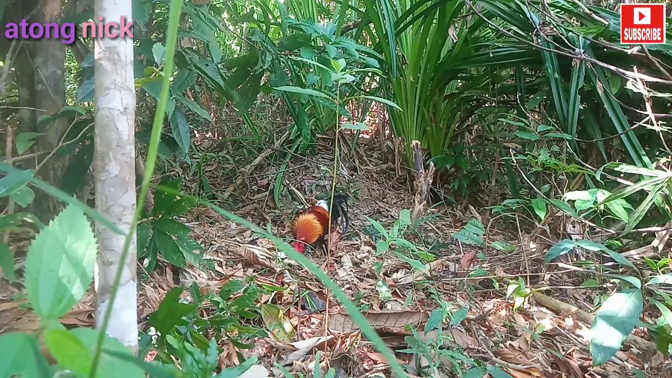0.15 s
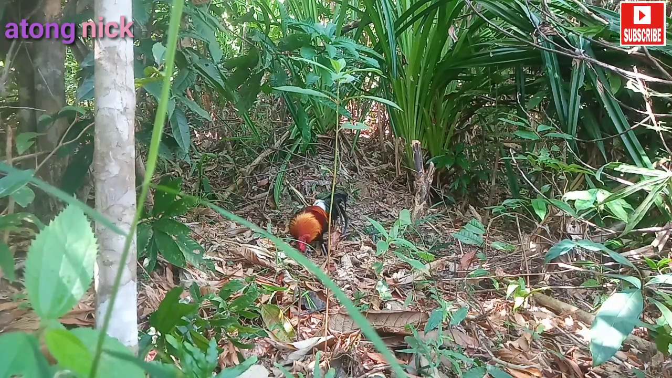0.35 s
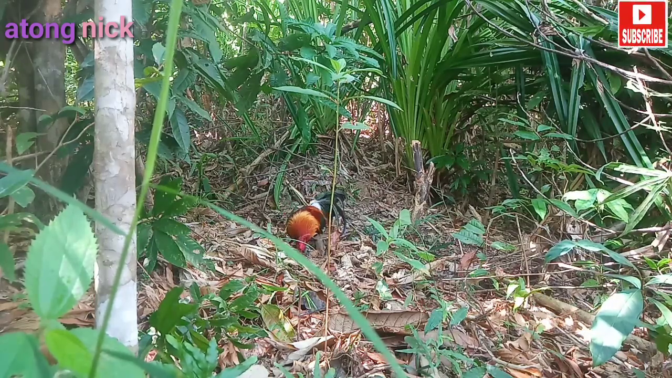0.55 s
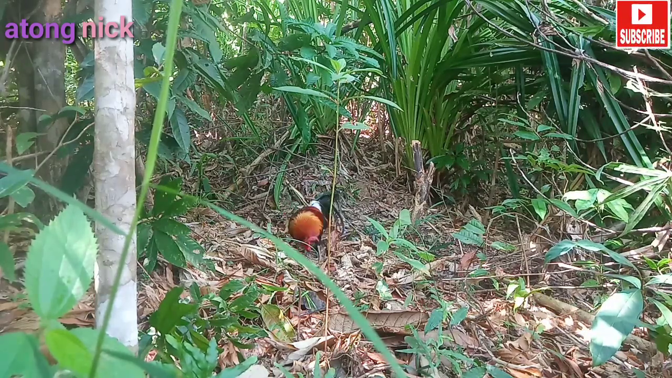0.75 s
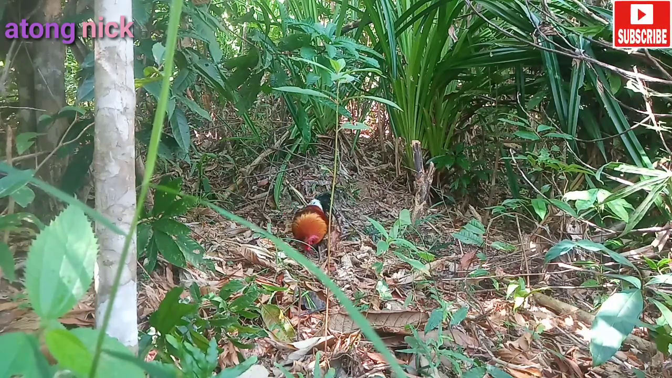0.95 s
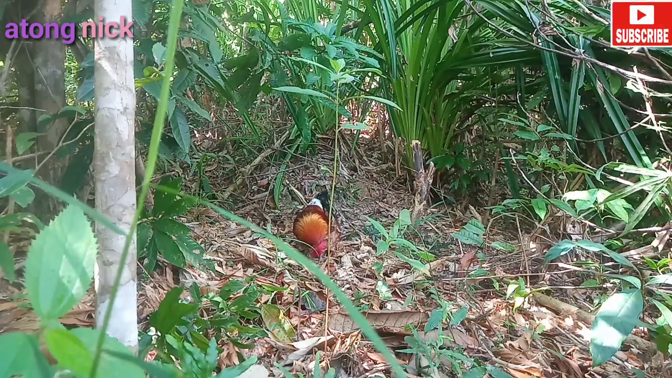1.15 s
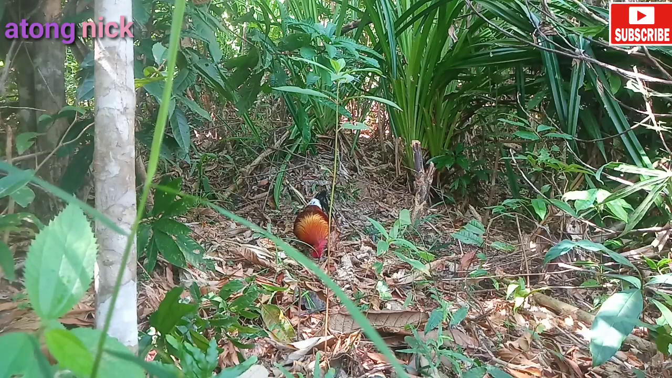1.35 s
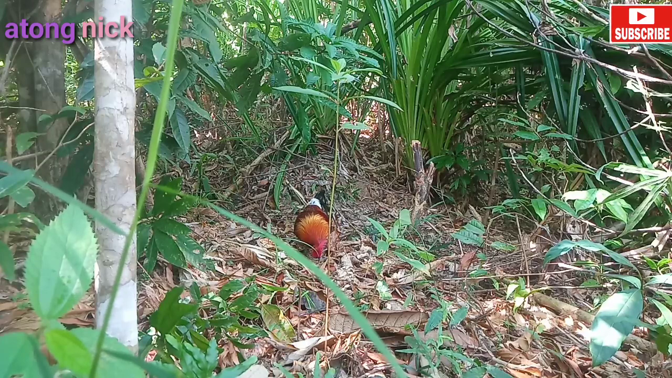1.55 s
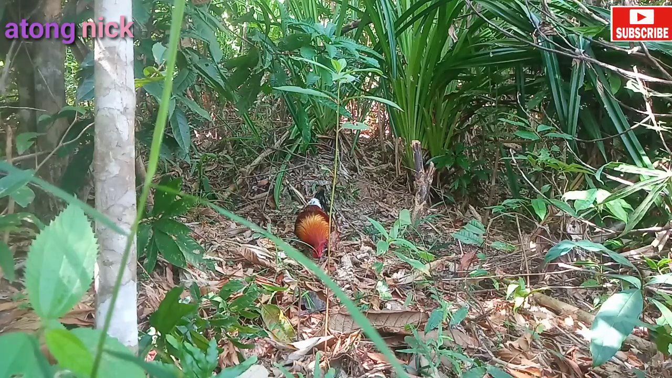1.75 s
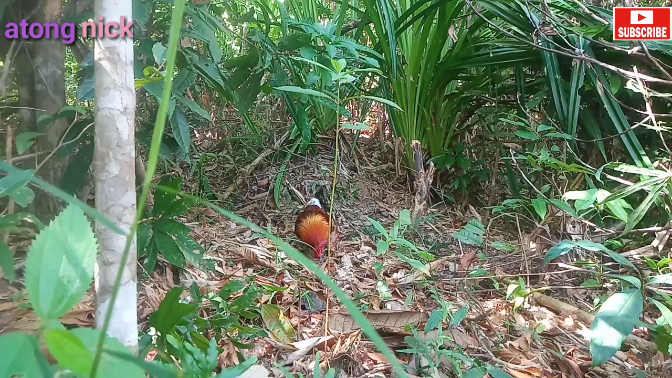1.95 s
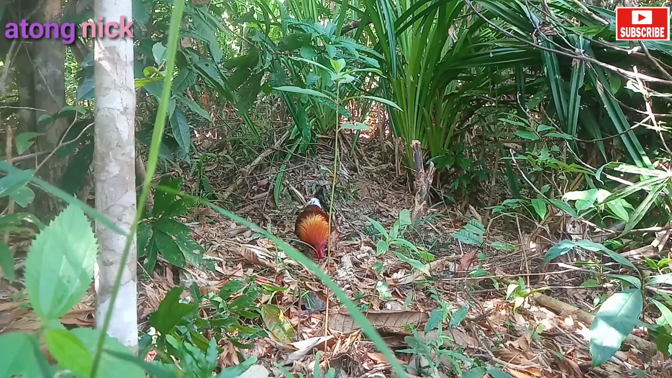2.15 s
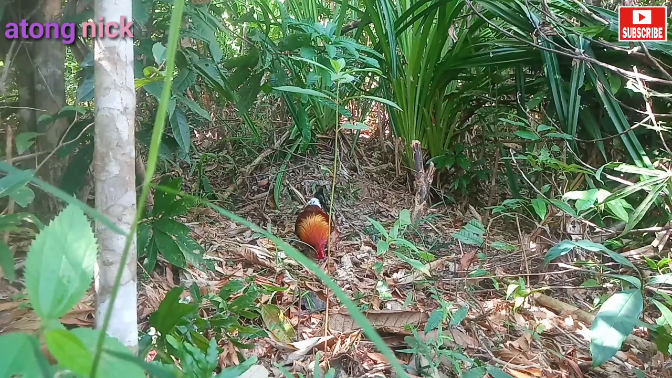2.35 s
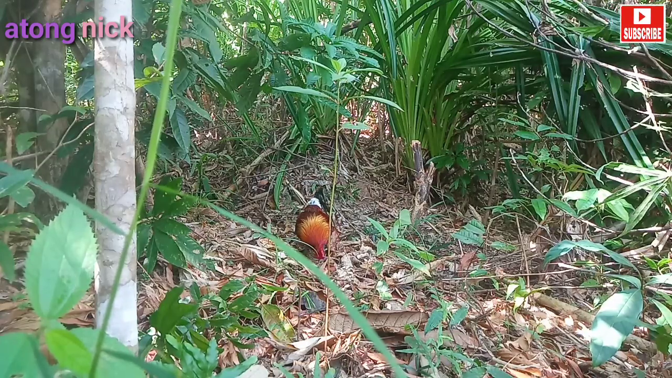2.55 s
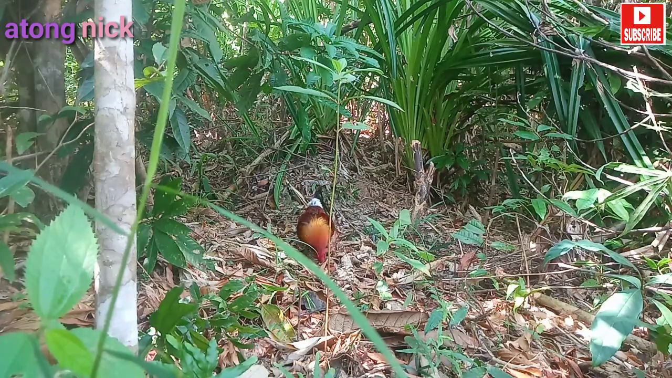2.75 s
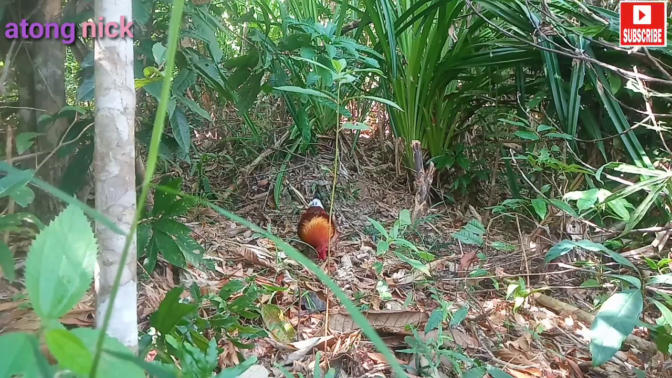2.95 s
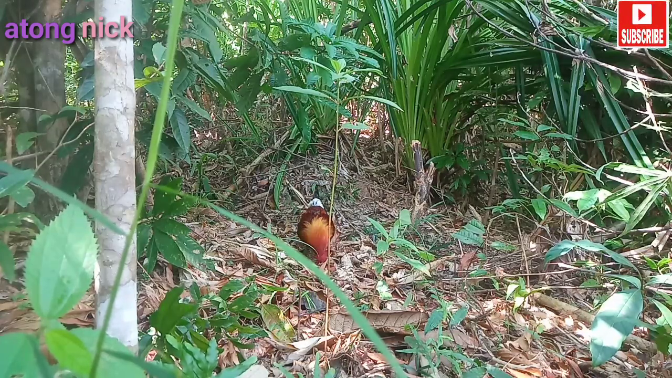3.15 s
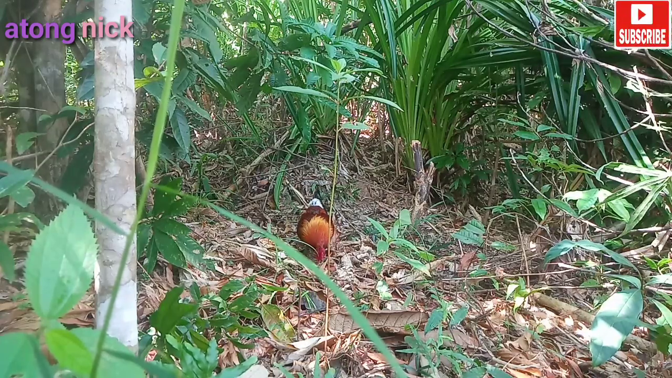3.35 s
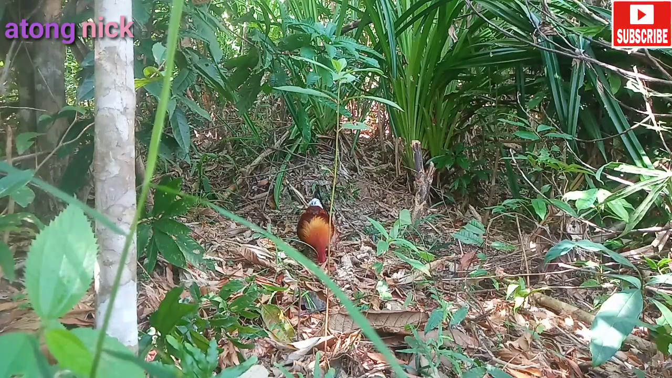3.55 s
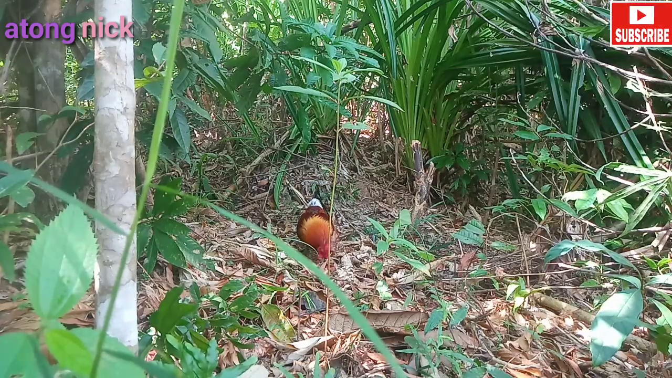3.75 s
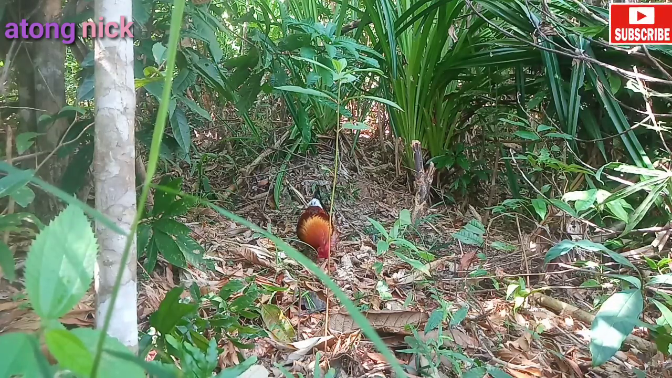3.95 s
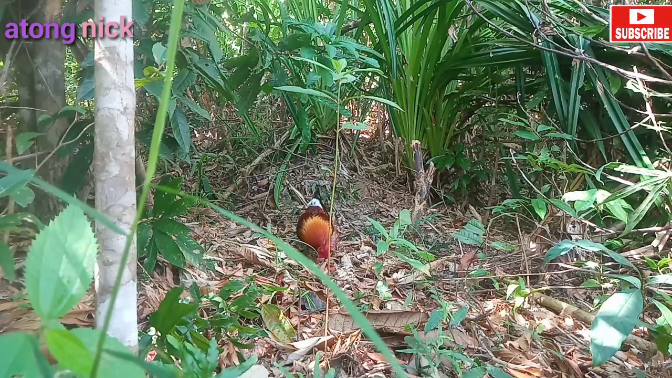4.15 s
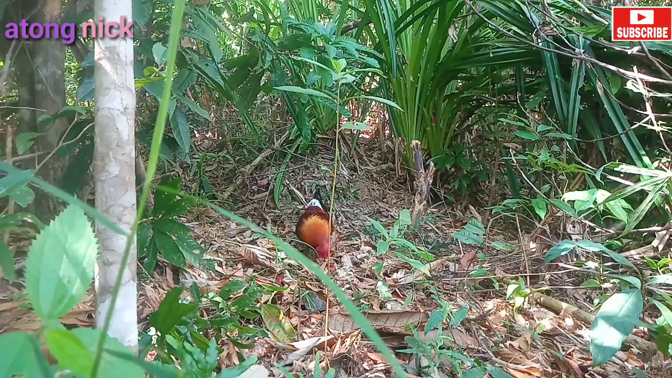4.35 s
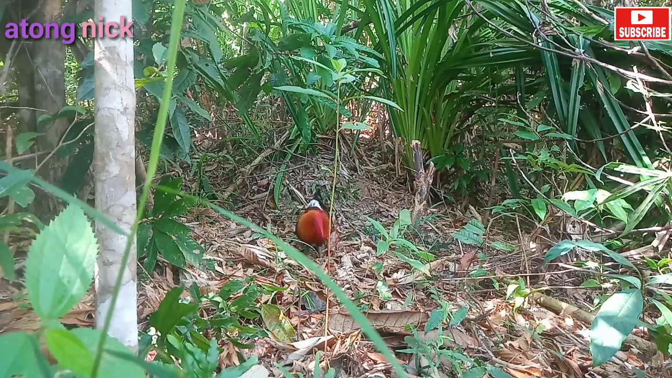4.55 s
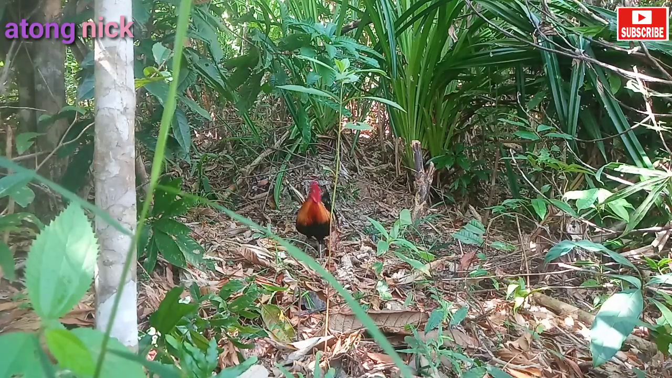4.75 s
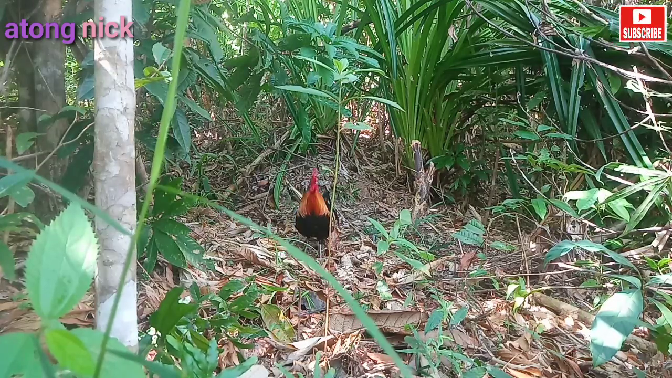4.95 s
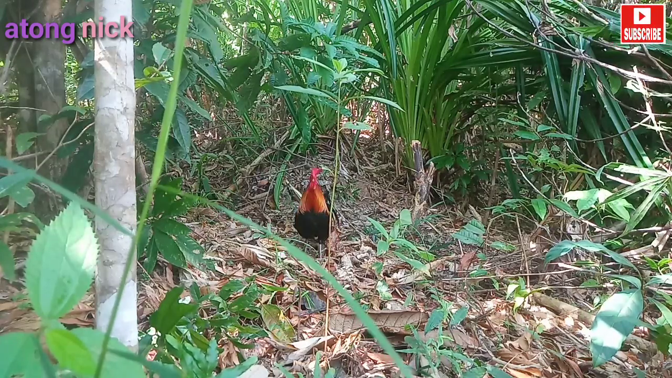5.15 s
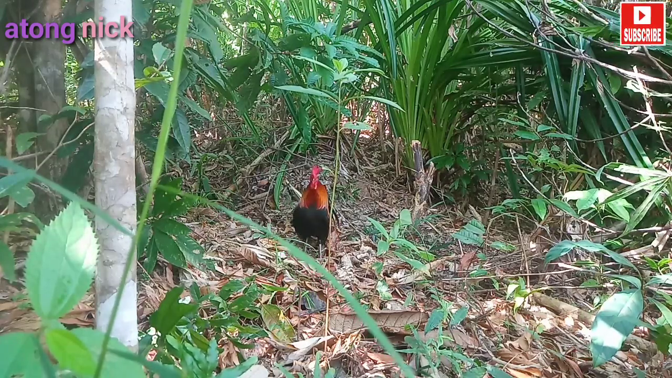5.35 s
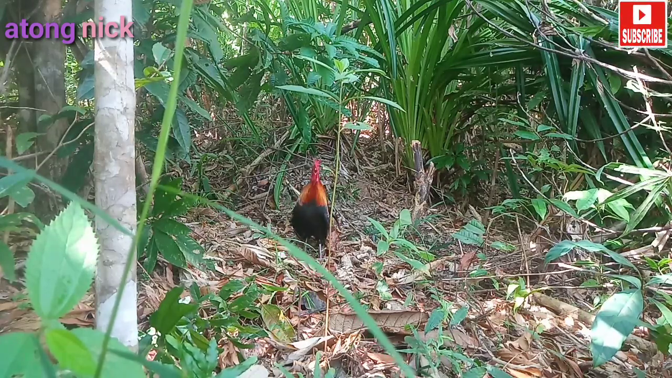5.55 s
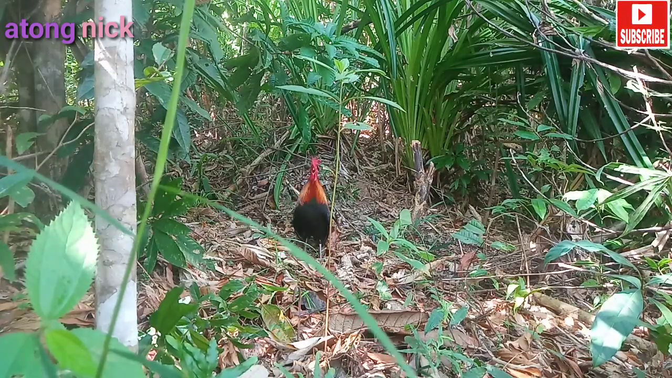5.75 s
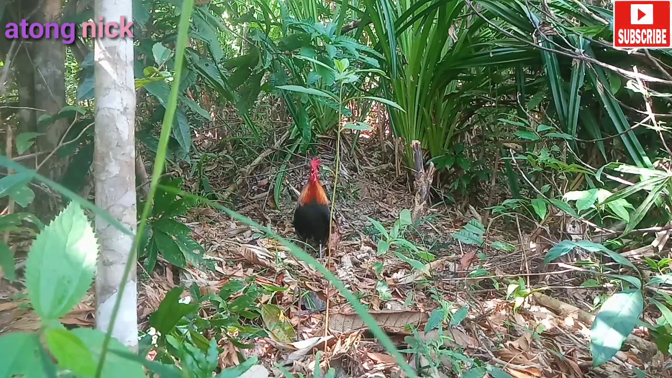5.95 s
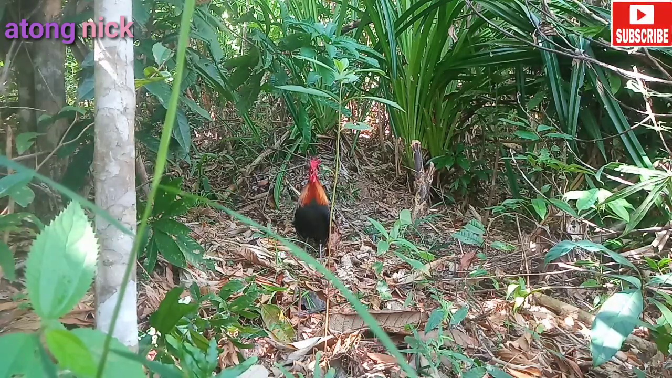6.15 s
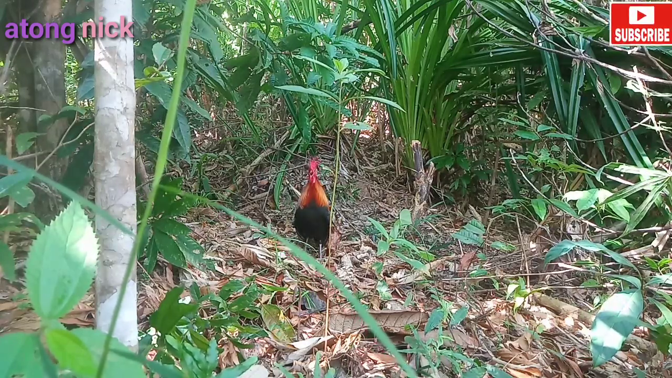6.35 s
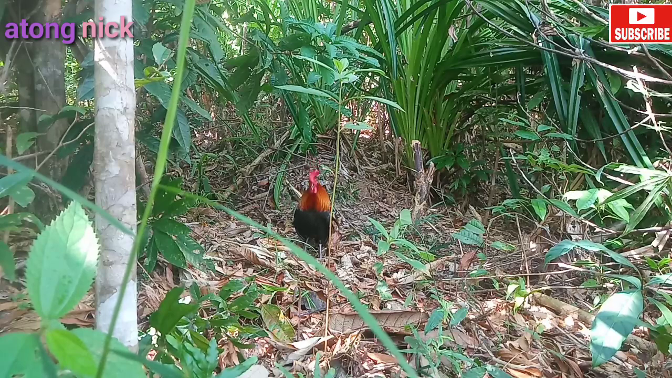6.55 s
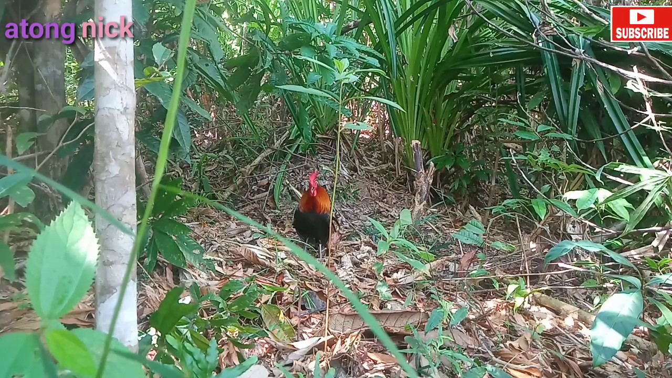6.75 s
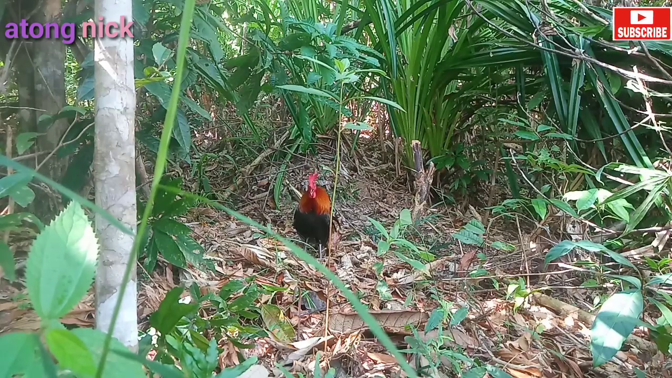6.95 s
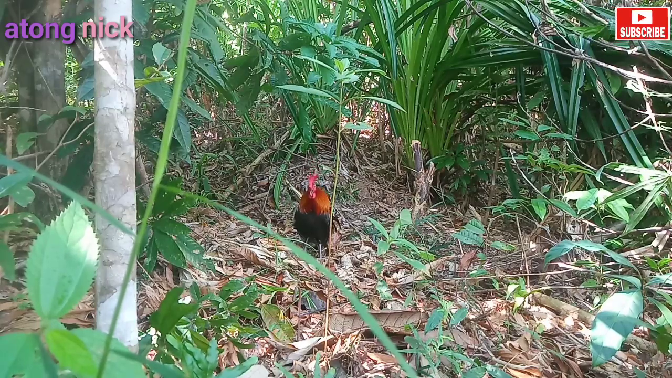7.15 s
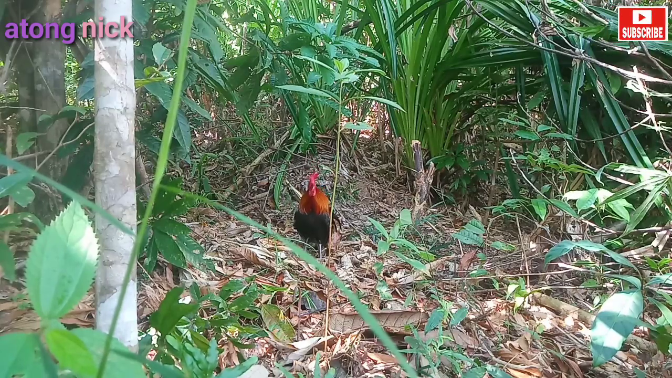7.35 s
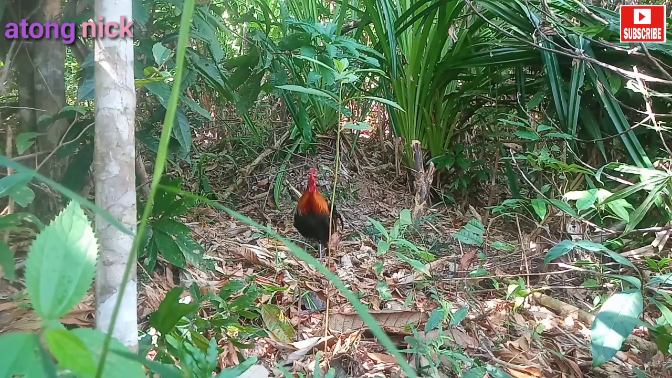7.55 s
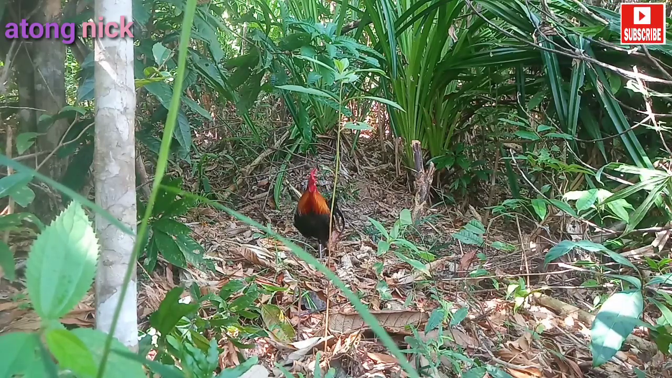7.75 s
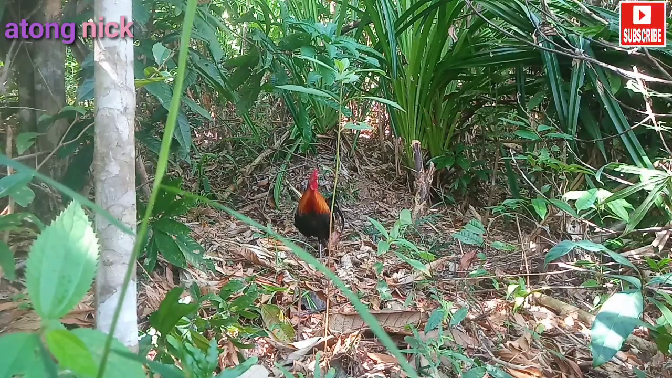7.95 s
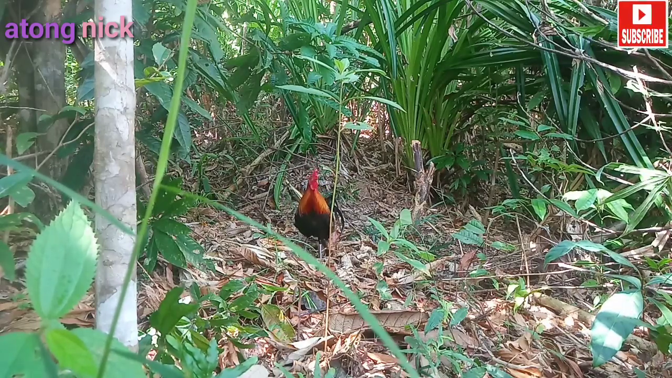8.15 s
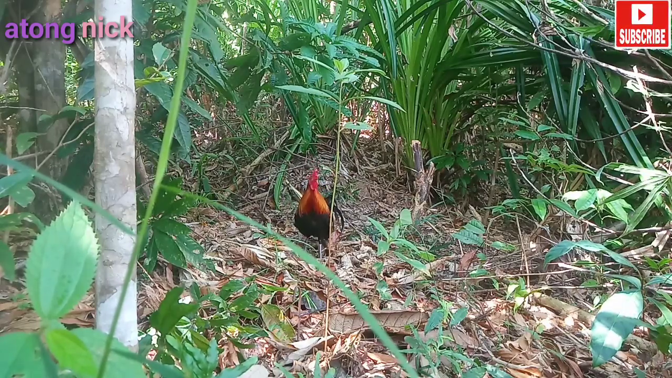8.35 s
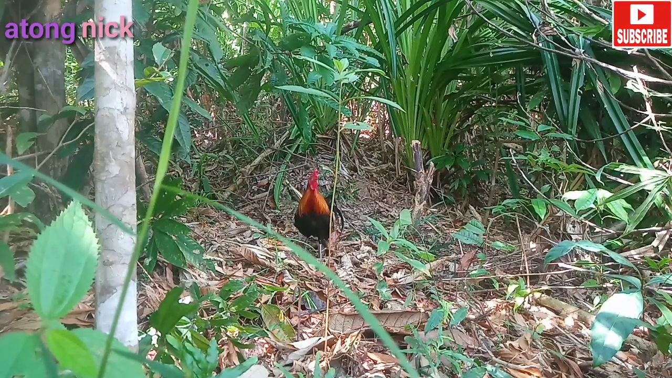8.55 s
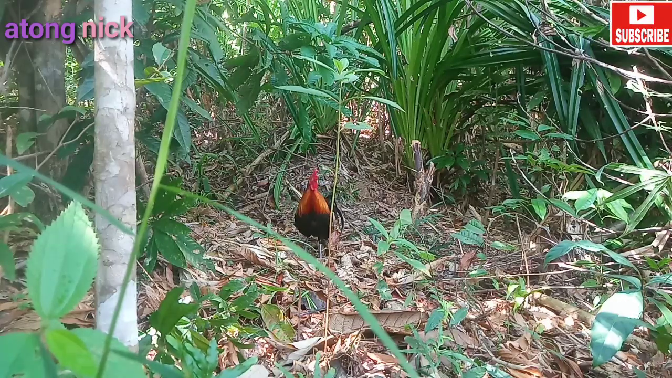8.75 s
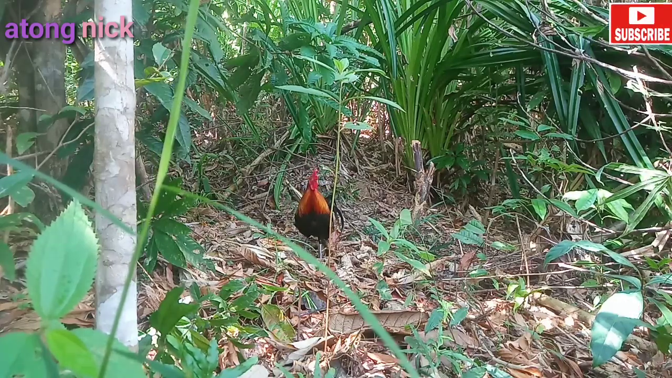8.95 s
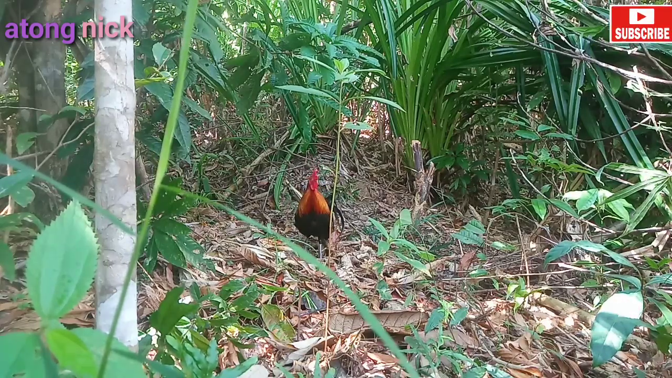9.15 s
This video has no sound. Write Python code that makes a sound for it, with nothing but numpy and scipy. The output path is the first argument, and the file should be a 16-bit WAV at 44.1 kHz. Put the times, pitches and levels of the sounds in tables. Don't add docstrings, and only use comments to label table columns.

```python
import sys
import numpy as np
from scipy import signal
from scipy.fft import rfft, irfft
from scipy.io import wavfile
from scipy.ndimage import uniform_filter1d, minimum_filter1d, map_coordinates

SR = 44100
rng = np.random.default_rng(int(sys.argv[2]) if len(sys.argv) > 2 else 0)


def waveform_to_disk(signal):
    frames = np.transpose(np.atleast_2d(signal))
    scaled = np.clip(frames, -1, 1) * 32767
    samples = np.round(scaled).astype(np.int16)
    wavfile.write(sys.argv[1], SR, samples)


def attenuation_scalar(level_db):
    decades = np.asarray(level_db, float) / 20
    return 10 ** decades


N = 406161

# [t/s, level/dB]
EFFORT = [
    [(5.42, -56.5), (5.426, -9), (5.432, 0.5), (5.452, -3), (5.48, -5), (5.556, -11.5), (5.59, -19),
     (5.622, -30), (5.635, -33.5), (5.665, -43.5)],
    [(5.67, -46), (5.69, -20), (5.704, -6.5), (5.95, -10.5), (6.2, -8), (6.405, -10.5), (6.428, -16),
     (6.448, -20), (6.495, -26.5), (6.58, -24.5)],
    [(6.51, -18), (6.55, -17.5), (6.58, -15), (6.604, -10), (6.758, -9.5), (6.996, -13), (7.15, -14)],
    [(7.12, -15), (7.174, -19), (7.258, -24), (7.316, -30), (7.35, -61.5)],
]
# [f/Hz, width/Hz, level/dB]
PIPE = [
    [(1070, 110, -14.5), (1300, 16, -24.5), (1801, 190, -3), (1927, 200, -3), (2440, 50, -24.5),
     (2920, 92, -12), (3080, 90, -4.5), (3400, 200, -20.5), (4126, 150, -20.5), (4320, 76, -19)],
    [(964, 91, -8.5), (1695, 110, 1), (1986, 70, -4), (2090, 100, -1.5), (2360, 81, -7), (2700, 20, -0.5),
     (2880, 110, -2.5), (3280, 78, -16), (4020, 55, -17.5), (4240, 110, -8.5), (5020, 71, -30.5)],
    [(760, 44, -14.5), (1050, 90, -18), (1810, 91, -2), (1934, 270, -1.5), (2082, 50, 1.5),
     (2400, 160, -11), (2666, 91, -11), (2785, 75, -1.5), (3160, 130, -17.5), (3973, 90, -12.5)],
    [(757, 52, -2.5), (1104, 110, -16.5), (1725, 180, -6), (1990, 78, 0), (2390, 120, -9), (2776, 69, -3.5),
     (3240, 54, -13.5), (4026, 72, -13)],
]
# [f/Hz, level/dB per Hz]
BODY = [
    [(240, -86), (400, -51), (866, -12.5), (1490, -29), (1920, 7.5), (2260, -16), (2920, -14), (4110, -26),
     (5600, -50), (7280, -83.5), (12300, -120)],
    [(240, -82), (400, -48.5), (946, -14), (1300, -14), (1680, -2), (2920, -8), (3720, -17), (4340, -17.5),
     (5600, -46.5), (7280, -81.5), (12300, -120)],
    [(240, -80), (400, -36.5), (751, -17), (1210, -35.5), (2050, 2.5), (2260, -11), (2760, -11.5),
     (4070, -21.5), (5600, -61), (7280, -94.5), (12300, -120)],
    [(240, -76), (400, -32.5), (672, -26), (751, -30.5), (936, -21), (2340, -1.5), (2980, -22.5),
     (4160, -23.5), (5600, -63.5), (7280, -105), (12300, -120)],
]
# [f/Hz, width/Hz, level/dB]
BEAK = [
    [(5400, 820, -53), (7200, 650, -53.5), (8100, 350, -49), (10400, 2520, -65.5), (13500, 5000, -69.5)],
    [(5040, 410, -32), (5200, 200, -32), (6150, 350, -36.5), (6620, 350, -43.5), (7170, 500, -30.5),
     (8000, 800, -43.5), (8630, 460, -40.5), (11000, 3400, -67.5), (13600, 1000, -65.5),
     (14940, 900, -58.5)],
    [(5050, 400, -47), (6000, 900, -65), (7150, 400, -54), (7620, 700, -47), (8250, 260, -42),
     (9250, 450, -51.5), (10400, 350, -55), (10940, 300, -62), (11850, 400, -65.5), (13360, 1700, -66.5),
     (15100, 900, -61.5)],
    [(5060, 600, -67), (7560, 1000, -59.5), (8300, 400, -53), (9300, 490, -64), (10460, 700, -70.5)],
]
# [mean beat rate/Hz, fade in/s, fade out/s, resonance shift at start/%, at end/%]
PARTS = [
    (960, 0.012, 0.014, 1.3, -6.5),
    (892, 0.011, 0.064, 1.2, -1.5),
    (900.6, 0.05, 0.045, 0.061, -1),
    (864, 0.033, .02, 1, 1),
]
# [brightness above 3 kHz/dB, its drift/(dB/s), beak level/dB, its drift/(dB/s)]
MOUTH = [
    (-1, -18, -2.5, -5.5),
    (1.5, -5, -1, -2.5),
    (-3, 10.5, -6, 7.5),
    (2, 17.5, 0, -34.5),
]
# [shift at start/%, settled shift/%, time constant/s]
BEAK_SLIDE = [
    (4.5, -8, 0.16),
    (0.5, 0.5, .4),
    (-4, -0.5, 0.11),
    (0, -1.5, .2),
]
# [t/s, length/s, level/dB]
TIPS = [(5.685, .1, 4), (5.885, .07, 4.5), (5.955, .07, -7), (6.055, .045, -5), (6.13, .04, 3),
        (6.215, .03, 6.5), (6.27, .06, 4), (6.35, .055, -5), (6.41, .04, 5), (6.57, .05, 3.5),
        (6.63, .03, -1.5), (6.68, .04, 2), (6.74, .06, -3), (6.93, .05, -2.5), (7.0, .04, 3)]
# [t/s, length/s, level/dB]
CHEST = [(5.76, .09, 4.5), (5.875, .03, -6.5), (6.02, .05, -5.5), (6.28, .05, 3), (6.5, .08, -8.5),
         (6.565, .095, -6), (6.675, .05, 3), (6.75, .03, 4.5), (6.87, .1, -2.5), (7.11, .028, -6),
         (7.04, .025, -5), (7.14, .03, 3), (7.195, .012, -10.5)]
# [t/s, length/s, level/dB]
RINGS = [(5.695, .03, 3), (5.73, .065, -4), (5.87, .07, -3), (5.95, .07, 2), (6.04, .08, -3),
         (6.2, .08, -3), (6.49, .085, -12), (6.615, .045, 3), (6.69, .1, -4), (6.805, .075, 3),
         (6.88, .03, -5), (6.915, .085, 3), (7.12, .06, -4), (7.19, .04, 3), (7.232, .03, -9),
         (7.3, .05, -6)]
# [t/s, length/s, level/dB]
BRIDGE = [
    (6.44, .125, 5),
]
# [t/s, length/s, f/Hz, level/dB, ducking of the hoarse voice/dB]
LOCKS = [(5.431, 0.0076, 1355, 2.5, -13.5), (6.025, 0.021, 1690, -10, -6.5), (6.115, 0.013, 1705, -3, -13),
         (6.452, 0.11, 1740, -30.5, -1.5), (6.495, 0.051, 1825, -28, -2), (5.692, .055, 1715, -16, -1.5),
         (5.745, .048, 1670, -16, -1.5), (5.895, .06, 1690, -17, -1.5), (6.07, .03, 2130, -17, -1.5),
         (6.215, .03, 1670, -16, -2), (6.36, .04, 2110, -18, -1.5), (6.405, .035, 1690, -17, -2),
         (6.58, .04, 1850, -17, -2), (5.72, .055, 1990, -19, -1), (5.835, .045, 2010, -19, -1),
         (5.955, .06, 2130, -18, -1), (6.68, .04, 1830, -18, -1), (6.76, .045, 2090, -18, -1),
         (6.935, .04, 2090, -19, -1.5), (7.064, .044, 866, -17, -14), (7.102, .036, 856, -20, -5),
         (7.166, .027, 763, -19, -12), (7.203, .026, 1045, -29.5, -2.5), (7.242, 0.032, 1018, -22.5, -11),
         (7.262, 0.016, 758, -49, 0), (7.286, 0.044, 835, -38.5, -8)]
# [f/Hz, level/dB]
LOCK_COLOUR = [(760, -4), (860, -13), (1000, -16), (1400, -10), (1530, -14), (1700, 0), (2300, 1),
               (2600, -6), (3050, -26), (3450, -21), (4300, -28), (5200, -52), (6500, -70), (7800, -38),
               (8800, -50), (12000, -62)]
# [t/s, f/Hz, level/dB]
GROAN = [(7.365, 200, -70), (7.385, 215, -60), (7.415, 265, -58), (7.445, 300, -50), (7.5, 322, -49),
         (7.527, 322, -50), (7.552, 280, -64), (7.58, 270, -75)]
# [f/Hz, level/dB]
GROAN_COLOUR = [(210, 0.5), (300, 15.5), (430, 14), (620, 3), (900, -8), (1300, -9)]
# [t/s, length/s, lift/dB]
GRUMBLES = [(5.72, .055, 17), (5.78, .07, 18), (6.09, .03, 14), (6.2, .03, 14), (6.285, .035, 15),
            (6.34, .06, 10), (6.85, .22, 13)]
# [t/s, low f/Hz, top f/Hz, end f/Hz, level/dB, hold/s]
BIRDS = [(.118, 3010, 4770, 3360, -63, .045), (2.066, 3500, 4430, 3800, -60.5, .045),
         (2.412, 3550, 4980, 3350, -60, .04), (2.974, 3470, 4880, 3400, -58.5, 0.037)]
# [t/s, length/s, f/Hz, end f/Hz, level/dB]
GLIDING_NOTES = [(.2, .03, 4550, 3450, -62), (.22, 0.2, 4880, 4780, -72), (.398, .036, 5150, 6250, -67),
                 (0.424, 0.038, 6280, 6050, -60), (.465, .055, 6020, 5920, -70), (0.523, .12, 6000, 6000, -82),
                 (0.223, 0.064, 3460, 3210, -56), (0.274, 0.05, 1103, 895, -59), (2.04, .06, 6300, 6400, -82),
                 (2.72, 0.058, 3010, 3080, -58), (8.804, 0.031, 1110, 1110, -60.5),
                 (8.885, 0.024, 6200, 6150, -72), (8.92, 0.018, 3880, 3910, -42),
                 (8.934, 0.042, 4060, 5330, -46.5), (8.973, 0.068, 5330, 5670, -52),
                 (9.045, .03, 5550, 5300, -62)]
# [t/s, crackle level/dB, leaf body level/dB, t60/s, rise/s]
LEAVES = [(0.52, -56, -41, 0.11, 0.00027), (.527, -72, -38, 0.56, 0.0046), (.54, -62, -50, .06, .002),
          (0.552, -57, -41.5, 0.13, 0.00045), (0.588, -61, -44, 0.07, .003),
          (0.66, -61, -37, 0.074, 0.00035), (0.689, -62, -47, .1, .002), (.702, -66, -44, 0.3, 0.004),
          (0.676, -55, -39, 0.093, .001), (2.364, -56, -59, 0.15, .003), (2.405, -49, -60, 0.15, .02),
          (2.605, -58, -58, 0.14, .01), (2.644, -55, -58, 0.29, .025), (2.911, -56, -45, 0.14, 0.016),
          (2.97, -56, -61, 0.25, .02), (3.2115, -54, -50, 0.025, .001), (3.6207, -63, -53, 0.08, 0.0055),
          (4.114, -48, -56, 0.13, 0.016), (4.169, -51, -40, 0.17, 0.016), (4.204, -64, -41, 0.093, 0.017),
          (8.8374, -53.5, -47.5, 0.059, 0.00075)]
# [f/Hz, level/dB]
CRACKLE = [(4500, -21), (6000, 1.5), (7500, 1.5), (8500, -11), (10000, -33), (12000, -74)]
# [f/Hz, level/dB]
LEAF = [(300, -100), (700, -13.5), (1200, -7.5), (3000, -4.5), (4800, -15), (6000, -41), (8000, -73)]
# [t/s, peak level/dB]
SNAPS = [(.5203, -34), (0.5535, -31), (.5595, -36), (.587, -37), (.6598, -28), (.679, -38)]
# [f/Hz, level/dB, t60/s]
TWIG = [(1150, -6, .05), (1600, -8, .02), (2600, -3.5, .022), (3300, -8, .015), (4600, -9, .014),
        (6200, -18, .008)]
# [t/s, centre f/Hz, level/dB]
SWISH = [(4.17, 2700, -68), (4.2, 3214, -43), (4.26, 3216, -58), (4.38, 3540, -56), (4.45, 3500, -59)]
# [t/s, level/dB]
WIND = [(0, -52), (1.3, -50), (2.3, -54.5), (5.4, -54.5), (7.3, -55.5), (7.85, -60), (8.45, -53.5),
        (8.5, -63), (8.75, -64.5), (8.8, -53.5), (9.21, -56)]
# [t/s, level/dB]
GUSTS = [(.25, 7.5), (.49, 1.5), (.75, 3.5), (.89, 0), (1.02, 6.5), (1.14, 6), (1.37, 1), (1.55, 6),
         (2.36, 5), (3.02, 6), (3.45, 7), (3.78, 9), (4.2, -1), (4.89, 7.5), (5.1, 9), (9.17, 7)]
# [f/Hz, level/dB per Hz]
RUMBLE = [(12, -46.5), (20, -15.5), (27, -21), (72, 2), (129, 4.5), (157, 2), (270, -10), (535, -22),
          (600, -19), (780, -27.5), (1320, -120)]
# [f/Hz, level/dB per Hz]
FOREST = [(150, -29), (250, -5), (530, -7), (830, -9), (1230, -4.5), (1700, -6), (2500, -5.5), (3300, -5),
          (3900, -8.5), (4150, -18), (4500, -14), (4900, -21.5), (5200, -31.5), (7000, -70.5)]
# [t/s, level/dB]
HISS = [(0, -71.5), (9.21, -73)]
# [f/Hz, level/dB per Hz]
HISS_COLOUR = [(300, -1.6), (5000, -0.27), (8000, 1), (15000, -1)]
# [f/Hz, t60/s]
TREES = [(500, 0.47), (3000, 0.48), (8000, 0.48)]
# [t/s, level/dB]
GAIN = [(0, -0.5), (5.44, 0), (5.52, -19), (7.2, -20.5), (7.33, -6), (7.8, -3.5), (9.21, -4.5)]
# [t/s, level/dB]
OVERLOADS = [(5.433, -36), (5.437, -40.5), (5.452, -42), (5.477, -42), (5.706, -44), (5.736, -53.5),
             (5.801, -45), (6.015, -46.5), (6.112, -51.5), (6.13, -43.5), (6.693, -51), (6.726, -53)]

BEAK_PER_DB, BRIGHT_PER_DB = 0.23, 0.16
TIP_DB, TIP_HZ = -1, 20
STRAND_PER_DB = 0.3
STEADY, STEADY_S = 0.38, .02
EVEN, EVEN_S = .6, .008
LOCK_DULL_DB = 1.5
LOCK_TOP_PER_DB, LOCK_FULL_DB = 3, -17
TOP_DUCK = .3
GRUMBLE_DB, INSECTS_DB = -74, -54
RISE_HZ_PER_S, DROP_S, LOW_DB_PER_KHZ = 30000, 0.026, 5.5
DROP_DB, NOTE_FADE_DB = -3, -4
SNAP_DB, SNAP_S = 13, 0.0012
GUST_S = 0.057


def crow():
    sway = .4 * wobble(14)
    tip_db, chest_db, ring_db = moments(TIPS), moments(CHEST), moments(RINGS)
    parts = zip(EFFORT, MOUTH, PIPE, BEAK, BODY, PARTS, BEAK_SLIDE)
    hoarse = sum(hoarse_part(*part, sway, tip_db, chest_db, ring_db) for part in parts)
    hoarse += (attenuation_scalar(moments(BRIDGE)) - 1) * band(hoarse, 1950, 2950)
    kept = signal.sosfiltfilt(signal.butter(4, 4700, "high", fs=SR, output="sos"), hoarse)
    kept += signal.sosfiltfilt(signal.butter(2, [2700, 2920], "band", fs=SR, output="sos"), hoarse)
    clear, duck_db = locked_tones()
    ducked = (hoarse - kept) * attenuation_scalar(duck_db) + kept * attenuation_scalar(TOP_DUCK * duck_db)
    voice = ducked * attenuation_scalar(0.74 * wobble(30)) + clear
    return signal.sosfilt(signal.butter(3, 480, "high", fs=SR, output="sos"), voice)


def hoarse_part(rows, mouth, pipe, beak, body, part, slide, sway, tip_db, chest_db, ring_db):
    rate_hz, rise, fall, shift, end_shift = part
    start, end = rows[0][0], rows[-1][0]
    span = slice(round(start * SR), round(end * SR))
    level_db = curves(rows)[0][span]
    n = len(level_db)
    t = np.arange(n) / SR
    effort_db = level_db - np.median(level_db)
    bright_db = mouth[0] + mouth[1] * t + BRIGHT_PER_DB * effort_db
    beak_db = mouth[2] + mouth[3] * t + BEAK_PER_DB * effort_db

    source = beats(n + SR // 4, rate_hz, scatter=.35, size_db=2.5)
    low = mottled(coloured(source, lambda hz: throat(pipe, body, hz)), patchy_db=2.2, size=6)
    top = coloured(source, lambda hz: beak_gain(beak, hz))
    top = mottled(top, patchy_db=2, size=2)

    settling = np.exp(-t / max(slide[2], .01))
    opening = 1 + (slide[1] + (slide[0] - slide[1]) * settling + sway[span]) / 100
    top = map_coordinates(top, [SR // 8 + np.cumsum(opening)], order=5)
    speed = 1 + (np.linspace(shift, end_shift, n) + sway[span]) / 100
    low = map_coordinates(low, [SR // 8 + np.cumsum(speed)], order=5)

    edge = signal.sosfilt(signal.butter(6, 3200, "high", fs=SR, output="sos"), low)
    chest, narrow = band(low, 650, 1150), band(low, 2640, 3000)
    strand, upper = band(low, 1450, 1880), band(low, 1880, 2250)
    strand_db = TIP_DB * wobble(TIP_HZ, n) + np.clip(-STRAND_PER_DB * effort_db, -3, 8) + tip_db[span] / 2
    low = low - strand - upper
    low += attenuation_scalar(strand_db) * evened(strand) + attenuation_scalar(-tip_db[span] / 2) * evened(upper)
    low += (attenuation_scalar(chest_db[span]) - 1) * chest
    low += attenuation_scalar(ring_db[span]) * evened(narrow) - narrow

    knots = np.arange(0, n, 250)
    rasp = attenuation_scalar(1.3 * np.interp(np.arange(n), knots, rng.standard_normal(len(knots))))
    voice = (low + (attenuation_scalar(bright_db) - 1) * edge + attenuation_scalar(beak_db) * rasp * top) / np.std(low)
    swell = np.abs(uniform_filter1d(voice ** 2, size=round(STEADY_S * SR))) + .05
    out = np.zeros(N)
    out[span] = attenuation_scalar(level_db) * unit(voice / swell ** (STEADY / 2))
    return out * np.sqrt(gate(start, end, rise, fall))


def beats(n, rate_hz, scatter, size_db):
    draw = rng.standard_normal((int(n / SR * 1500), 2))
    at = np.cumsum(np.exp(scatter * draw[:, 0])) * SR / rate_hz
    whole = np.floor(at)[:, None] + np.arange(-7, 9)
    offset = whole - at[:, None]
    pulse = np.sinc(offset) * np.cos(np.pi * offset / 16) ** 2 * attenuation_scalar(size_db * draw[:, 1:])
    return np.bincount(whole.ravel().astype(int) + 8, pulse.ravel(), n)[:n]


def throat(modes, body, hz):
    return np.sqrt(resonances(modes, hz) / (1 + (hz / 4900) ** 12) + attenuation_scalar(2 * (along(body, hz) - 4.5)))


def beak_gain(modes, hz):
    return np.sqrt(resonances(modes, hz, order=3) / (1 + (5000 / (hz + 1)) ** 8))


def resonances(modes, hz, order=2):
    return sum(attenuation_scalar(2 * db) / (1 + (1.5 * (hz - c) / w) ** 2) ** order for c, w, db in modes)


def locked_tones():
    clear, duck_db, tremor = np.zeros(N), np.zeros(N), 1 + 0.0022 * wobble(140)
    colour = [(f, level - LOCK_DULL_DB * max(f / 1000 - 3, 0)) for f, level in LOCK_COLOUR]
    for s, length, hz, db, hoarse_db in LOCKS:
        span = slice(round(s * SR), round((s + length) * SR))
        on = gate(s, s + length, 0.0059)
        top_db = LOCK_TOP_PER_DB * min(db - LOCK_FULL_DB, 0)
        dulled = [(f, level + (f > 5000) * top_db) for f, level in colour]
        clear[span] += attenuation_scalar(db) * tone(hz * tremor[span], dulled, count=14) * on[span]
        duck_db += hoarse_db * on
    return clear, duck_db


def tone(pitch_hz, colour, count):
    phase = 2 * np.pi * np.cumsum(pitch_hz) / SR
    harmonics = range(1, count + 1)
    return unit(sum(attenuation_scalar(along(colour, k * pitch_hz)) * np.sin(k * phase + k * k) for k in harmonics))


def groan():
    start, end = GROAN[0][0], GROAN[-1][0]
    span = slice(round(start * SR), round(end * SR))
    hz, db = (c[span] for c in curves(GROAN))
    note = np.zeros(N)
    note[span] = attenuation_scalar(db) * tone(hz * (1 + 0.015 * wobble(52, len(hz))), GROAN_COLOUR, count=4)
    return gate(start, end, 0.012) * note


def grumble():
    lift_db = moments(GRUMBLES)
    air = unit(band(rng.standard_normal(N), 300, 560))
    return (lift_db > 0) * attenuation_scalar(GRUMBLE_DB + lift_db + 3 * wobble(40)) * air


def birds():
    out, husk = np.zeros(N), wobble(400)
    calls = []
    for s, low, top, end, db, hold in BIRDS:
        times = s + np.cumsum([0, (top - low) / RISE_HZ_PER_S, hold, .004, DROP_S])
        carry_db = LOW_DB_PER_KHZ * np.array([top - low, 0, 0, 0, top - end]) / 1000
        calls.append((times, [low, top, top, top - 200, end], db + carry_db + [0, 0, 0, DROP_DB, DROP_DB]))
    for s, length, hz, end, db in GLIDING_NOTES:
        calls.append(([s, s + length], [hz, end], [db, db + NOTE_FADE_DB]))
    for s, pitch, level in calls:
        span = slice(round(s[0] * SR), round(s[-1] * SR))
        t = np.arange(N)[span] / SR
        hz, db = np.interp(t, s, pitch), np.interp(t, s, level)
        phase = 2 * np.pi * np.cumsum(hz * (1 + 0.0094 * husk[span])) / SR
        octave = attenuation_scalar(-28 - np.clip((hz - 4000) / 25, 0, 30)) * np.sin(2 * phase)
        out[span] += attenuation_scalar(db + 3) * gate(s[0], s[-1], .004, .008)[span] * (np.sin(phase) + octave)
    return out


def leaves():
    edge, body, t = np.zeros(N + SR), np.zeros(N + SR), np.arange(SR // 4) / SR
    for s, db, body_db, t60, rise in LEAVES:
        spiky_db = 6.2 * rng.standard_normal(len(t))
        grains = rng.standard_normal((2, len(t))) * attenuation_scalar(spiky_db - 60 * t / max(t60, .005))
        grains *= np.clip(t / max(rise, 1e-4), 0, 1) * attenuation_scalar(SNAP_DB * np.exp(-t / SNAP_S))
        edge[round(s * SR):][:len(t)] += attenuation_scalar(db - 3.0) * grains[0]
        body[round(s * SR):][:len(t)] += attenuation_scalar(body_db + 2.0) * grains[1]
    crackle = coloured(edge[:N], lambda hz: attenuation_scalar(along(CRACKLE, hz)))
    flap = coloured(body[:N], lambda hz: attenuation_scalar(along(LEAF, hz)))
    return crackle + mottled(flap, patchy_db=4, size=1)


def twig():
    out, t = np.zeros(N), np.arange(SR // 20) / SR
    for (s, db), vary in zip(SNAPS, rng.normal(0, 1, (len(SNAPS), len(TWIG)))):
        ring = np.zeros(len(t))
        for (hz, level, t60), v in zip(TWIG, vary):
            ring += attenuation_scalar(level + 2.8 * v - 60 * t / t60) * np.sin(2 * np.pi * hz * (1 + .03 * v) * t)
        out[round(s * SR):][:len(t)] += attenuation_scalar(db - 7.5) * ring
    return out


def branch():
    hz, db = curves(SWISH)
    carrier = np.sin(2 * np.pi * np.cumsum(hz) / SR)
    return attenuation_scalar(db) * gate(SWISH[0][0], SWISH[-1][0], .01) * unit(wobble(900)) * carrier


def echoes(x, stretch=1):
    hz, t, z = signal.stft(rng.standard_normal(SR), SR, nperseg=256)
    decay = attenuation_scalar(-60 * t / (stretch * along(TREES, hz))[:, None])
    tail = signal.istft(z * decay, SR, nperseg=256)[1]
    return signal.fftconvolve(x, tail / np.linalg.norm(tail))[:N]


def floor():
    s, db = np.transpose(GUSTS)
    puffs = np.bincount((s * SR).astype(int), db, N)
    gust_db = signal.fftconvolve(puffs, np.bartlett(round(2 * GUST_S * SR)), "same")
    lumps = attenuation_scalar(1.5 * wobble(18) + 2 * wobble(6))
    wind = attenuation_scalar(curves(WIND)[0] + gust_db) * unit(lumps * rush(RUMBLE, patchy_db=2.0))
    insects = attenuation_scalar(INSECTS_DB + .6 * wobble(5)) * rush(FOREST, patchy_db=4.2)
    hiss = attenuation_scalar(curves(HISS)[0]) * rush(HISS_COLOUR, patchy_db=0.5)
    gain = attenuation_scalar(curves(GAIN)[0])
    after = np.arange(N) > 7.3 * SR
    return np.where(after, 1, gain) * wind + gain * insects + np.sqrt(gain) * hiss


def rush(spectrum, patchy_db):
    x = mottled(rng.standard_normal(N + SR), patchy_db, size=9)
    return unit(coloured(x, lambda hz: attenuation_scalar(along(spectrum, hz))))[SR // 2:][:N]


def mottled(x, patchy_db, size):
    z = signal.stft(x, nperseg=1024)[2]
    field = uniform_filter1d(rng.standard_normal(z.shape), size=3, axis=0)
    field = uniform_filter1d(field, size=size, axis=1)
    return signal.istft(z * attenuation_scalar(patchy_db * unit(field)), nperseg=1024)[1][:len(x)]


def coloured(x, gain):
    size = 8192
    ceps = irfft(np.log(gain(np.fft.rfftfreq(size, 1 / SR)) + 1e-7))
    ceps[1:size // 2] *= 2
    ceps[size // 2 + 1:] = 0
    return signal.fftconvolve(x, irfft(np.exp(rfft(ceps))))[:len(x)]


def band(x, lo_hz, hi_hz):
    return signal.sosfiltfilt(signal.butter(3, [lo_hz, hi_hz], "band", fs=SR, output="sos"), x)


def evened(x):
    swell = np.abs(uniform_filter1d(unit(x) ** 2, size=round(EVEN_S * SR))) + .1
    return np.std(x) * unit(x / swell ** (EVEN / 2))


def moments(rows):
    t = np.arange(0, N / SR, .002)
    steps = 0
    for s, length, db in rows:
        steps = steps + db * np.clip(np.minimum(t - s, s + length - t) / .012 + .3, 0, 1)
    return np.interp(np.arange(N) / SR, t, steps)


def curves(rows):
    s, *cols = np.transpose(rows)
    return [np.interp(np.arange(N) / SR, s, c) for c in cols]


def along(points, hz):
    f, v = np.transpose(points)
    return np.interp(np.log(hz + 1), np.log(f + 1), v)


def gate(start, end, fade, fade_out=None):
    t = np.arange(N) / SR
    return np.clip(np.minimum((t - start) / fade, (end - t) / (fade_out or fade)), 0, 1)


def wobble(rate, n=N):
    return map_coordinates(rng.standard_normal(int(n * rate / SR) + 4), [np.arange(n) * rate / SR])


def unit(x):
    return x / np.sqrt(np.mean(x ** 2) + 1e-20)


def scene():
    rooster, far, near = crow() + groan(), birds(), leaves() + branch()
    returning = attenuation_scalar(curves(GAIN[2:])[0])
    wet = attenuation_scalar(-22) * returning * echoes(rooster, stretch=2.5)
    wet += attenuation_scalar(-25) * echoes(rooster, stretch=.9)
    wet += attenuation_scalar(-13) * echoes(rooster, stretch=.12)
    wet += attenuation_scalar(4.0) * echoes(far)
    wet += attenuation_scalar(-8) * echoes(near)
    direct = rooster + attenuation_scalar(-5) * far + near + twig()
    return (direct + wet + floor() + grumble())[None]


def top_cut(x):
    return signal.sosfilt(signal.butter(12, 15750, fs=SR, output="sos"), x)


def record(dry):
    hold = 90
    need = np.minimum(1, .97 / (np.abs(dry) + 1e-9))
    need = minimum_filter1d(need, size=2 * hold + 1, axis=1)
    out = dry * uniform_filter1d(need, size=hold, axis=1)
    tick = np.hanning(12) + .3 * np.hanning(12) ** 12
    for s, db in OVERLOADS:
        out[:, round(s * SR):][:, :12] += attenuation_scalar(db + 22.5) * tick
    out = signal.sosfiltfilt(signal.cheby2(24, 40, 15870, fs=SR, output="sos"), out)
    return top_cut(out)


dry = scene()
out = record(dry)
waveform_to_disk(out)
```